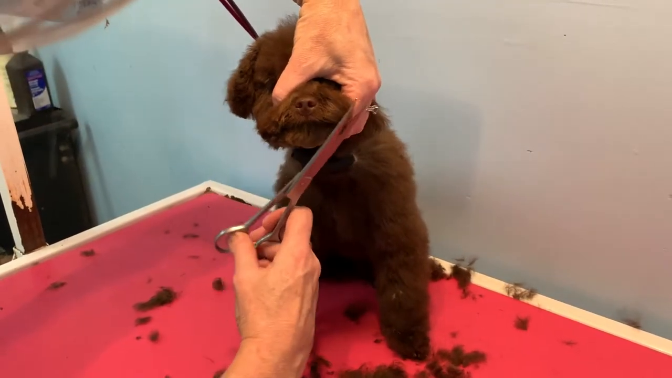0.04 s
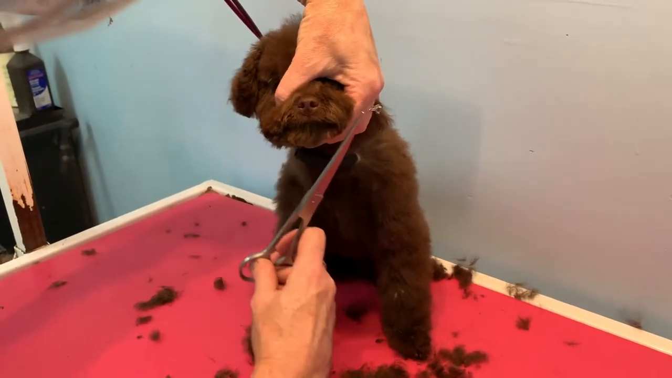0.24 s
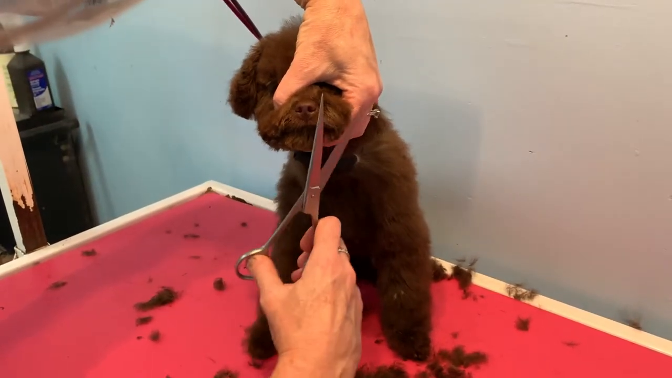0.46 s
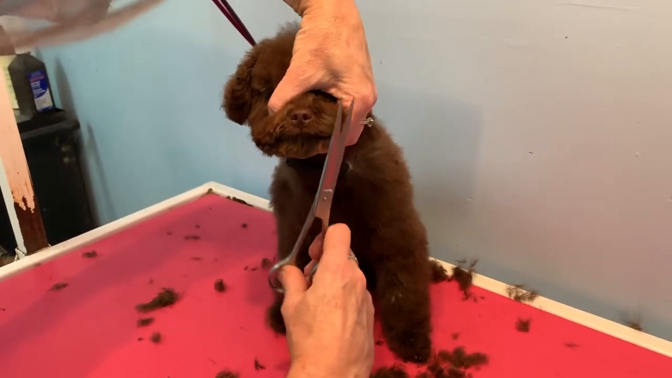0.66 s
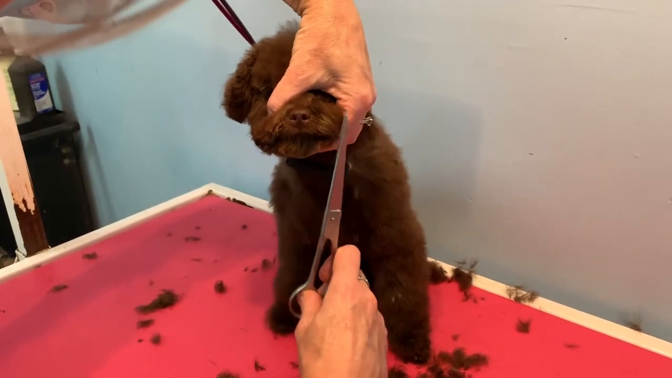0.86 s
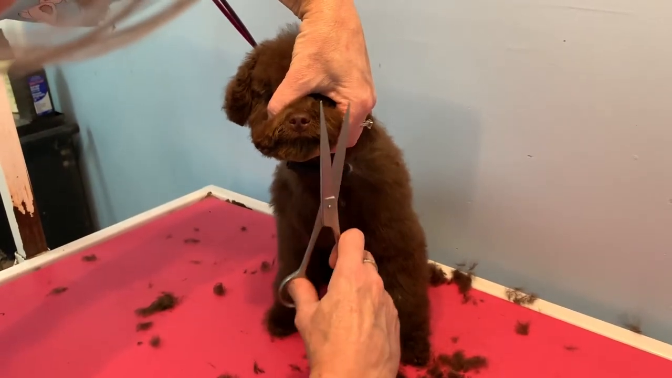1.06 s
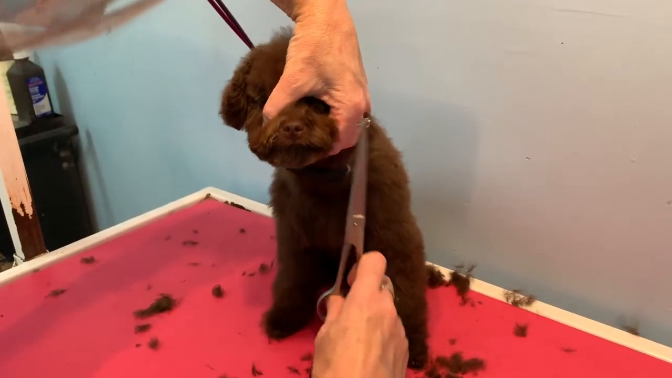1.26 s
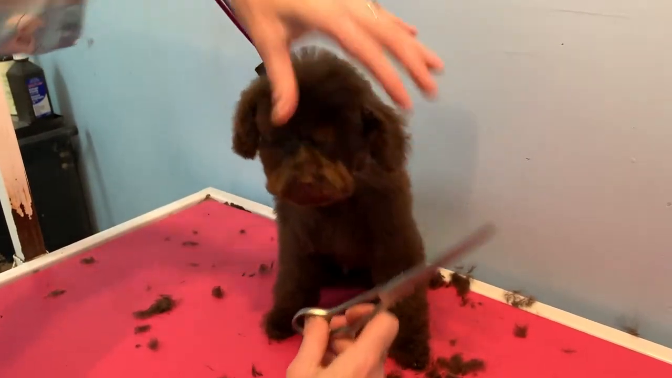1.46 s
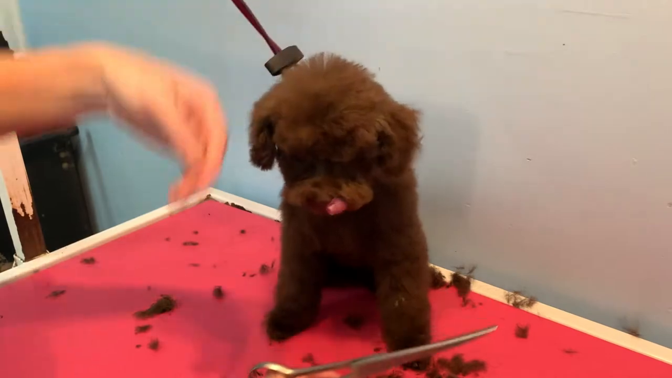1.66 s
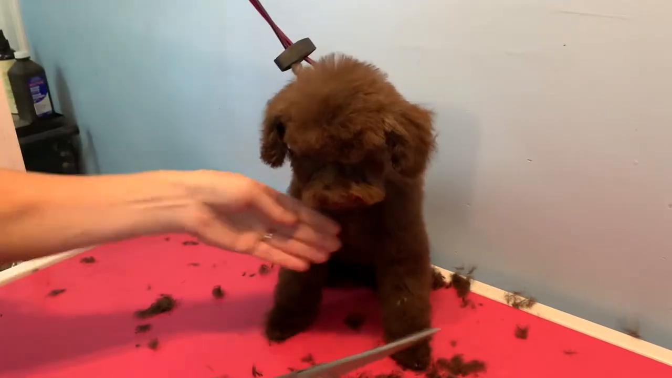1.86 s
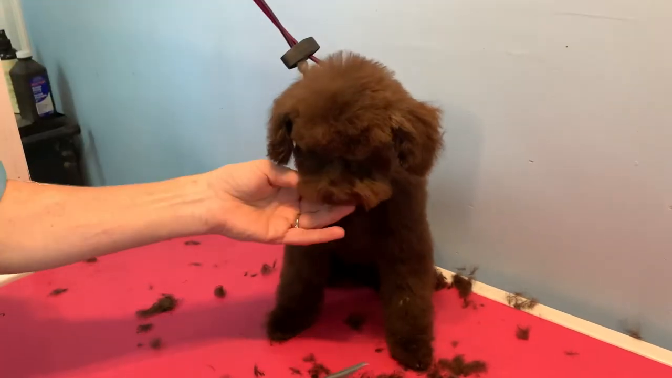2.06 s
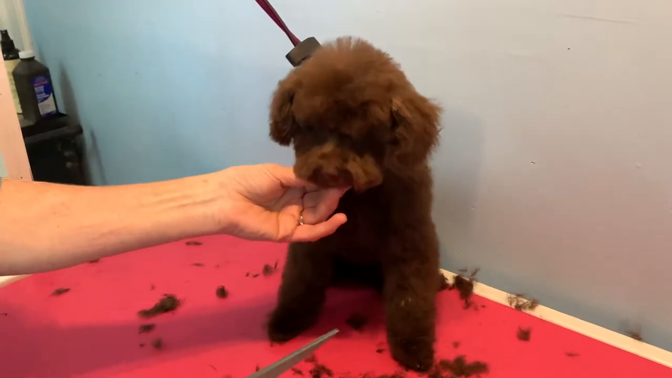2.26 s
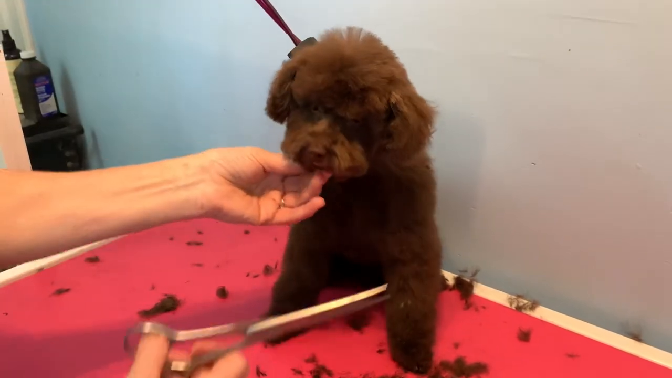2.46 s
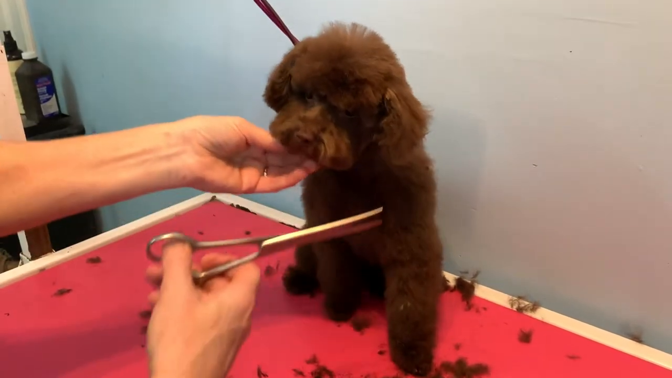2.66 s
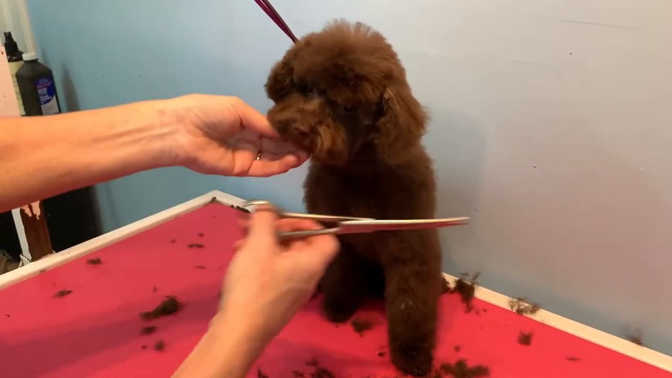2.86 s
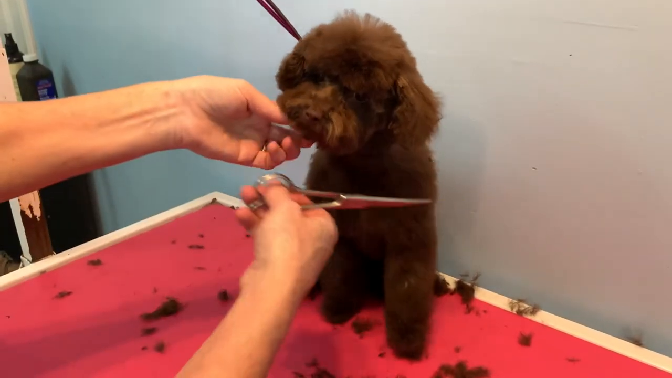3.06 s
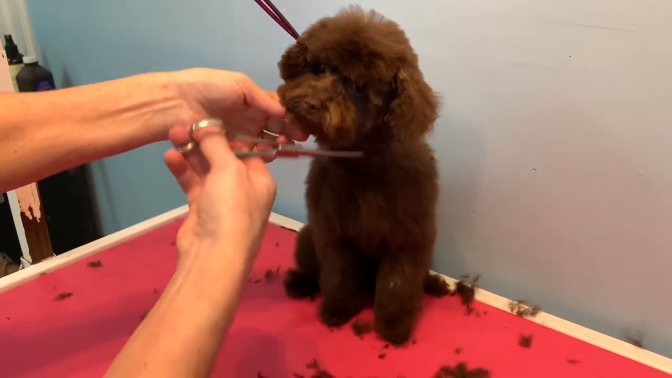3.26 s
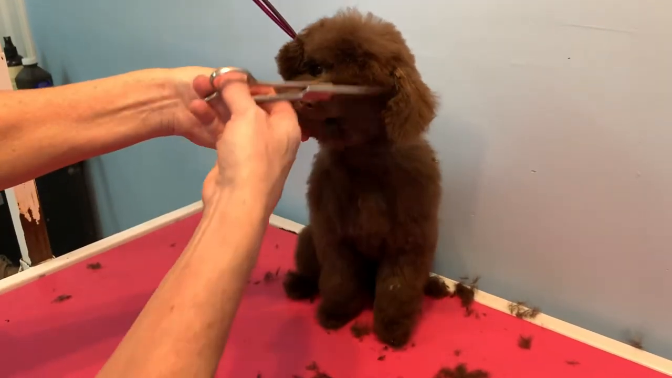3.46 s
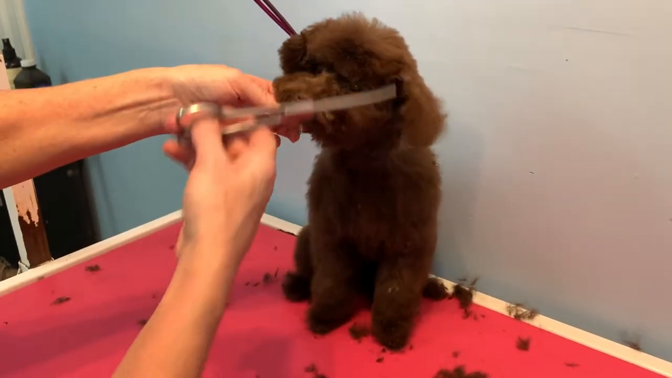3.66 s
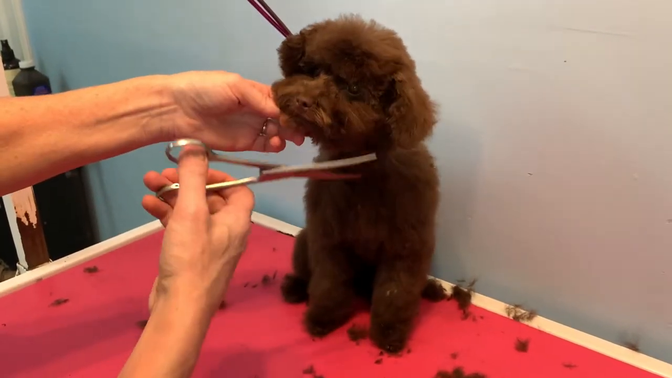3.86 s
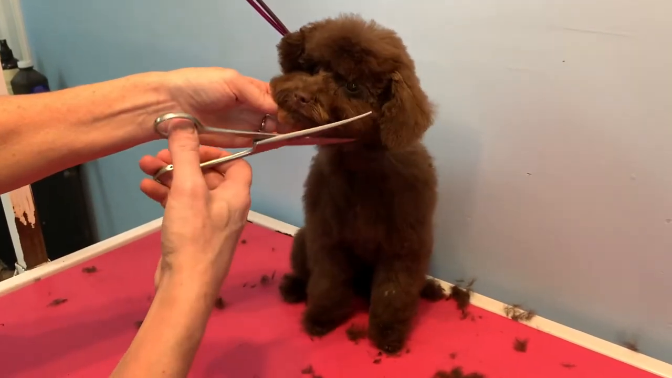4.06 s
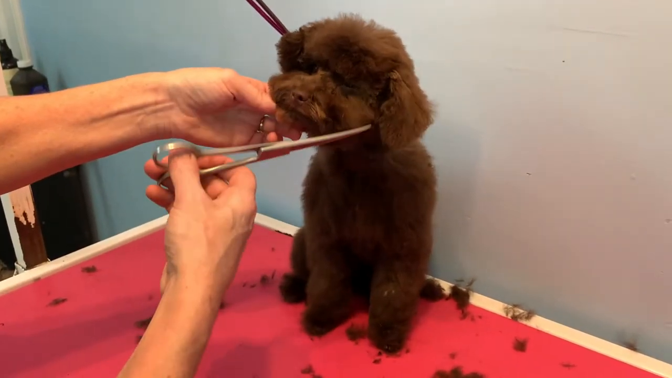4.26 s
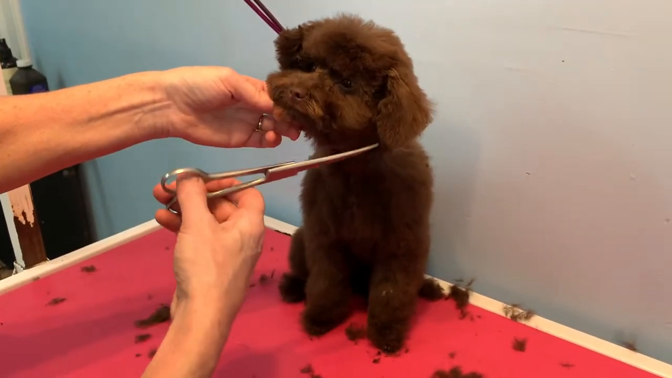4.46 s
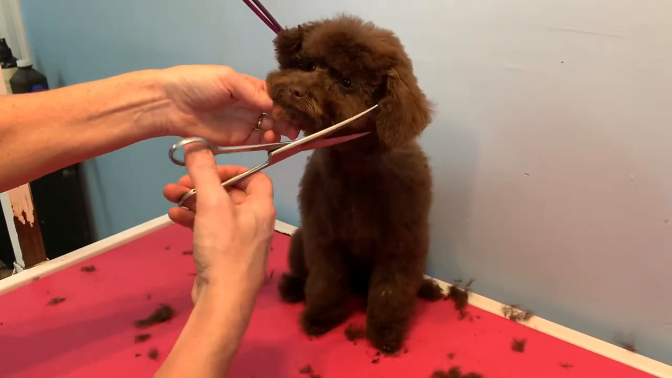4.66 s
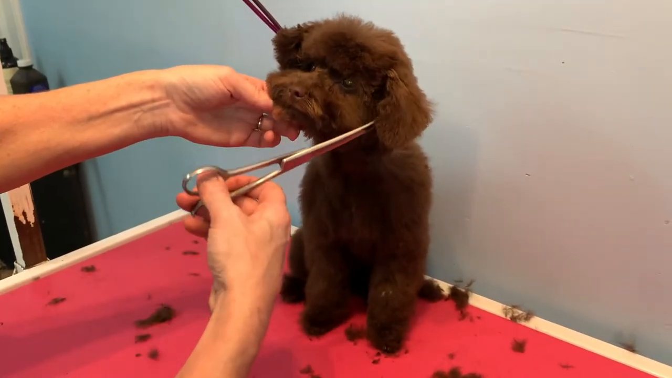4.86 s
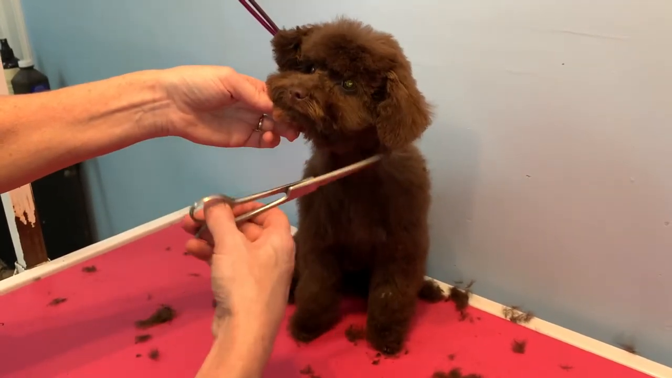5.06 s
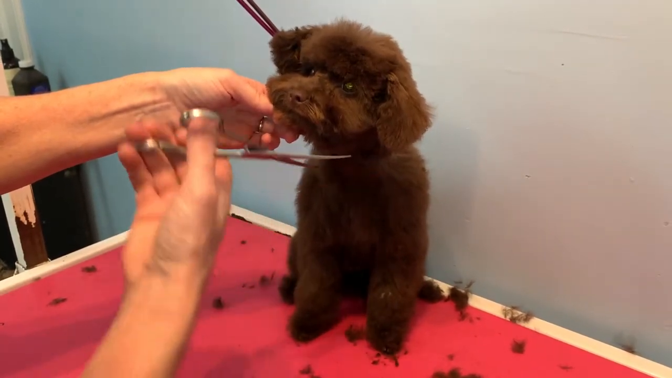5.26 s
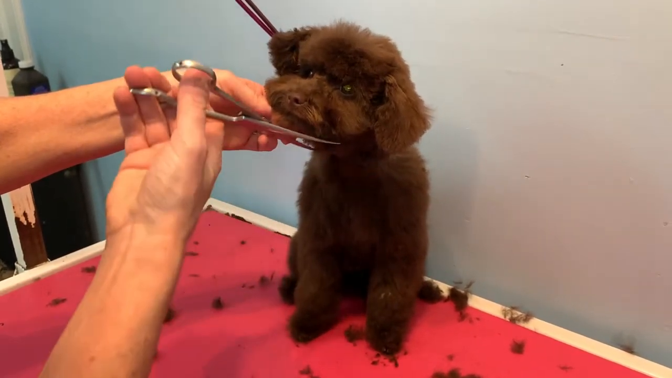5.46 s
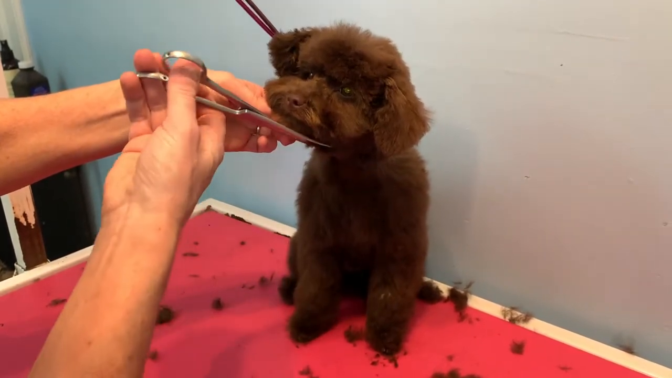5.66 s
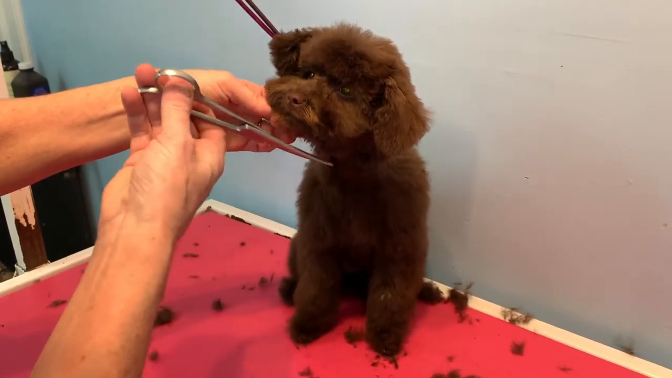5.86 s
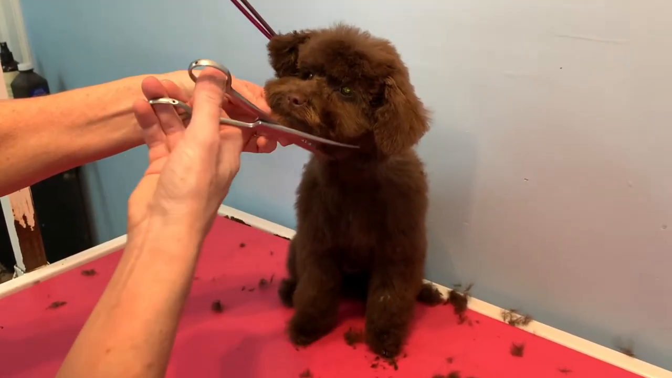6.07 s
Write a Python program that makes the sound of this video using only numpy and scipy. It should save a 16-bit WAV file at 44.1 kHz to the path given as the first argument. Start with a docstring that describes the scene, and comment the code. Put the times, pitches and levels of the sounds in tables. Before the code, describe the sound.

Close, slightly right of a stereo microphone in a small hard room, steel shears give bright, dry snips at irregular gaps, some preceded by faint scraping. Midway the cutting pauses: fur and cloth rustle and paws knock dully on a padded table. Behind, a bearing squeaks up to six times a second over low motor hum and moving air. Cutting resumes, with the strongest snap near the end.

```python
"""Steel grooming shears cut dog hair in a small hard room, to the right of a two-port microphone.
Noise bursts strike the ringing modes of the blades in snaps and ticks; tiny slips grind the same modes.
Shaped noise makes fur and cloth rustle, and falling tones make paws knock on a padded table.
Behind them a bearing squeaks up to six times a second, from gliding tones and hiss.
Two motors hum as sums of wavering sines, over a wash of air made of coloured noise."""
import sys
import numpy as np
from scipy import signal
from scipy.fft import rfft, irfft
from scipy.io import wavfile
from scipy.ndimage import uniform_filter1d

SR = 44100
rng = np.random.default_rng(int(sys.argv[2]) if len(sys.argv) > 2 else 0)


def invert_db(level):
    """Linear amplitude ratio for a level in decibels (20 dB per decade), elementwise."""
    return 10 ** (np.asarray(level, dtype=float) / 20)


def inscribe(sig):
    """Save sig as 16-bit PCM at rate SR to the path in sys.argv[1].

    A 1-D sig is mono; a 2-D sig holds one channel per row.
    Samples are clipped to [-1, 1] before scaling.
    """
    pcm = np.round(np.clip(np.atleast_2d(sig).T, -1, 1) * 32767)
    wavfile.write(sys.argv[1], SR, pcm.astype(np.int16))


N = 269884  # samples


def evened(x):
    """Scales a sound to an rms of one."""
    return x / np.sqrt(np.mean(x ** 2) + 1e-20)


def read(points, hz):
    """Reads a curve of (f/Hz, value) between its points, on a logarithmic pitch scale."""
    f, value = np.transpose(points)
    return np.interp(np.log(hz + 1), np.log(f + 1), value)


def add(mix, s, sound):
    """Adds a sound to the mix at time s, cut off at the end of the mix."""
    part = mix[round(s * SR):][:len(sound)]
    part += sound[:len(part)]


# tones in which the steel blades ring: f/Hz, relative level/dB, basic time to fall 60 dB t60/s
BLADES = [(1300, -29.5, 0.0057), (1735, -15.5, 0.0028), (2140, 3.5, .007), (2780, -12, 0.0054),
          (3410, -10.5, 0.0048), (4023, 4, 0.019), (4340, 1.5, 0.0082), (4954, 5.5, 0.014), (5400, 2, .008),
          (6070, 4, 0.0077), (7440, -8, 0.013), (7840, -2.5, 0.0034), (8184, 1.5, 0.026), (8520, -2, 0.007),
          (9270, -11.5, 0.0093), (9600, -3.5, .008), (10100, -0.5, 0.02), (9945, -1.5, 0.0094),
          (10400, -2.5, 0.0082), (10645, 3, 0.018), (11340, 6.5, 0.006), (12900, 8.5, 0.0048),
          (14160, -0.5, 0.011), (13820, -3, 0.006), (12550, -2, 0.0063), (14100, 16.5, 0.0065),
          (14800, 7, 0.008), (14980, -11.5, 0.0063), (15280, 5.5, 0.018), (10900, -3.5, .006)]
# borders between the low, middle, high and top groups of blade modes: f/Hz
GROUP_EDGES_HZ = [6500, 9100, 12000]


def modes(ring, free=1, detune=1):
    """The dying tone of each blade mode and its group; a loose grip lets the middle group ring on."""
    hz, db, t60 = np.transpose(BLADES)[:, :, None]
    t = np.arange(3000) / SR
    group = np.digitize(hz, GROUP_EDGES_HZ)
    t60 = t60 * ring * np.where(group == 1, free, 1)
    tones = invert_db(db - 60 * t / t60) * np.sin(2 * np.pi * hz * detune * t)
    return tones, group[:, 0]


# clicks of the blades, from loud closing snaps to small ticks as they open:
# t/s, then relative level/dB of the top, low, middle and high mode groups,
# and looseness of the grip (factor on the ring time of the middle group)
CLICKS = [(0.1025, -24, -45, -30.5, -36.5, 0.24), (0.2919, -41, -57, -49, -52, 0.47),
          (0.32, -38, -58, -48, -52, .8), (0.7175, -22.5, -43.5, -29, -34.5, 0.34),
          (0.9134, -54, -63, -53, -51, .8), (.9498, -50, -59, -60, -58, .8),
          (1.1628, -17, -37, -21.5, -25.5, 0.55), (1.489, -16, -40.5, -22.5, -22, 2),
          (2.9428, -23, -38, -25, -26.5, 2.6), (3.8146, -33.5, -44.5, -45, -35, 0.97),
          (4.2721, -21, -35.5, -25.5, -27.5, 1.1), (4.5014, -46, -61, -50, -43, 0.55),
          (4.8933, -16, -28, -21.5, -19, 1.3), (5.116, -44, -54, -51, -58, .8),
          (5.7087, -41.5, -46, -52.5, -36, .8), (5.7535, -10, -29.5, -18.5, -14.5, 0.94),
          (5.955, -37.5, -58, -44, -46.5, 0.72)]


def clicks():
    """Each click gives every blade mode one sharp blow and a few milliseconds of chatter."""
    out, t = np.zeros(N), np.arange(700) / SR
    blow = np.exp(-t / 0.00022) + 0.28 * np.exp(-t / 0.0052)
    jolts = rng.standard_normal((len(CLICKS), len(BLADES), len(t)))
    for (s, top_db, low_db, middle_db, high_db, free), jolt in zip(CLICKS, jolts):
        # the grip shifts the modes a little
        rings, group = modes(1.05, free, detune=1 + .008 * jolt[:, -1:])
        struck = signal.fftconvolve(jolt * blow, rings, axes=1)
        # each struck mode keeps the energy of its plain ring
        struck *= (np.linalg.norm(rings, axis=1) / np.linalg.norm(struck, axis=1))[:, None]
        struck *= invert_db(1.1 * jolt[:, -2:-1])  # no two blows land on the same spot
        for g, db in enumerate([low_db, middle_db, high_db, top_db]):
            part = struck[group == g].sum(0)
            loudest = uniform_filter1d(part ** 2, size=88).max()  # power over 2 ms
            add(out, s, invert_db(db) * part / np.sqrt(loudest * 2))
    return out


STOP_DB_PER_S = 900  # how fast grinds and swells die away
GRIND_START_DB, GRIND_HIGH_DB = -18.5, -4  # level at the start against the end; high group against top
# the edges grinding while the blades close: start t/s, end t/s,
# level/dB of the low, middle and top mode groups at the end
GRINDS = [(0.032, .1, -60, -76, -72), (0.563, .716, -82, -55, -59), (1.078, 1.16, -75, -78, -63),
          (3.755, 3.813, -74, -78, -64.5), (4.198, 4.271, -65.5, -72, -59),
          (4.769, 4.891, -69.5, -60, -55.5), (5.571, 5.75, -69.5, -69.5, -54)]


def grind_power(t):
    """Grinding swells steadily in dB as the blades close, in each mode group."""
    power = np.zeros((4, N))
    for start, end, low_db, middle_db, top_db in GRINDS:
        growth = np.interp(t, [start, end], [GRIND_START_DB, 0])
        outside = np.maximum(np.maximum(t - end, start - t), 0)  # seconds away from the grind
        groups_db = np.c_[[low_db, middle_db, top_db + GRIND_HIGH_DB, top_db]]
        power += invert_db(growth - STOP_DB_PER_S * outside + groups_db) ** 2
    return power


SWELL_RISE_DB_PER_S = 1102
# level/dB of the low, middle, high and top mode groups, added to each swell
SWELL_GROUPS_DB = [-10, 4, -3.5, 2.5]
# short noise swells up to a loud snap: end t/s, level/dB at the end before the group levels
SWELLS = [(.714, -51), (1.158, -47), (3.813, -57), (4.27, -44.5), (4.889, -38), (5.752, -40)]


def swell_power(t):
    """A short noise swells steeply up to each of several loud snaps, then dies quickly."""
    power = np.zeros((4, N))
    for end, db in SWELLS:
        shape = np.where(t < end, SWELL_RISE_DB_PER_S, -STOP_DB_PER_S) * (t - end)
        power += invert_db(db + shape + np.c_[SWELL_GROUPS_DB]) ** 2
    return power


def swell_past(t, s):
    """True once the first swell to peak after time s has reached its peak."""
    return t > min([end for end, db in SWELLS if end > s], default=np.inf)


CATCH_RISE_DB_PER_S, CATCH_MIDDLE_DB = 902, -10  # middle group against the high one
# an edge catching on hair or on the other blade: t/s, level/dB of the high mode group,
# level/dB of the low and top groups against it, fade in dB a second
CATCHES = [(0.02, -59, -35, -12, 500), (0.058, -48, -25, -4, 500), (0.288, -71, 0, -8, 252),
           (.322, -64, -6, 4, 600), (.568, -69, -11, -9, 300), (0.599, -54, -30, -24, 450),
           (0.658, -48, -39, 1, 800), (0.912, -66, -2, -13, 380), (1.118, -61.5, -26, 1, 300),
           (4.22, -59.5, -13, 2, 202), (4.46, -60.5, -7.5, -5, 456), (4.5, -60, -3, 8, 500),
           (4.784, -61, -20, -7, 100), (4.804, -55, -23, -1, 800), (4.826, -57.5, -7, 3.5, 400),
           (5.074, -66, -5, 0, 150), (5.122, -69.5, -4, -0.5, 400), (5.6, -74, -27, -4, 49.7),
           (5.64, -71, -30, -3, 100), (5.675, -50.5, -15.5, 1, 150), (5.709, -68, -23, -6, 400),
           (5.919, -60, -7.5, 0, 302), (5.953, -62, -10, 3, 604)]


def catch_power(t):
    """An edge catches, then slides free in a fade that ends at the peak of the next swell at the latest."""
    power = np.zeros((4, N))
    for s, db, low_db, top_db, fade in CATCHES:
        shape = np.where(t < s, CATCH_RISE_DB_PER_S * (t - s), -fade * (t - s))
        groups_db = np.c_[[low_db, CATCH_MIDDLE_DB, 0, top_db]]
        power += invert_db(db + shape + groups_db) ** 2 * ~swell_past(t, s)
    return power


def strokes():
    """Clumps of tiny slips along the edges and parting hairs excite each group of blade modes."""
    t = np.arange(N) / SR
    drift = uniform_filter1d(rng.standard_normal((4, N)), size=150, axis=1)
    clumps = invert_db(6.8 * evened(drift))
    slips = clumps * rng.standard_normal((4, N))
    slips *= invert_db(3.2 * np.minimum(rng.exponential(1, N), 5))  # now and then a much stronger slip
    rings, group = modes(ring=1.0)
    parts = []
    for g, slip in enumerate(slips):
        ringing = signal.oaconvolve(slip, rings[group == g].sum(0))[:N]
        parts.append(evened(ringing))
    power = grind_power(t) + catch_power(t) + swell_power(t)
    return (np.sqrt(power) * np.array(parts)).sum(0)


LAG = 13  # samples by which the shears reach the left port late
# close echoes off table and hands, a list for the left port and one for the right: t/s, level/dB
BOUNCES = [
    [(.0011, -6), (.0021, -4), (.0086, -11)],
    [(.0009, -6), (.0018, -5), (.008, -12)],
]


def ports(x):
    """Direct sound, late at the left port, and a few close bounces that differ between ports."""
    out = np.array([np.r_[np.zeros(LAG), x[:-LAG]], x])
    for channel, bounces in zip(out, BOUNCES):
        for s, db in bounces:
            add(channel, s, invert_db(db) * x[:N - round(s * SR)])
    return out


# paws shifting on the table: t/s, relative level/dB, f/Hz before the fall in pitch
THUMPS = [(2.228, -42.5, 211), (2.277, -37, 310)]


def thumps():
    """Dull, falling knocks of the padded table top, each with a short low scuff."""
    out, t = np.zeros(N), np.arange(2500) / SR
    band = signal.butter(2, [200, 520], "band", fs=SR, output="sos")
    scuffs = evened(signal.sosfilt(band, rng.standard_normal((len(THUMPS), len(t)))))
    for (s, db, hz), scuff in zip(THUMPS, scuffs):
        knock = invert_db(-60 * t / 0.059) * np.sin(2 * np.pi * hz * t * (1.05 - 3 * t))
        onset = 1 - np.exp(-t / 0.001)
        add(out, s, invert_db(db) * onset * (knock + 0.2 * scuff * invert_db(-60 * t / 0.17)))
    return out


# how alike noise is at the two ports: f/Hz, likeness before each sound's own factor (1 = identical)
SAME = [(60, 0.94), (120, 1), (170, .4), (240, 1), (400, .9), (500, 0.22), (1200, 0.1), (2400, 0.025),
        (15000, .1)]


def noise(colour, patchy_db, alike=1):
    """Two channels of random short-time spectra with drifting patches."""
    hz = np.fft.rfftfreq(1024, 1 / SR)
    a, b, c, d, patches = rng.standard_normal((N // 256 + 5, 513, 5)).T
    patches = uniform_filter1d(uniform_filter1d(patches, size=12, axis=0), size=10, axis=1)
    same = np.clip(alike * read(SAME, hz), -1, 1)[:, None]
    left = a + 1j * b
    right = same * left + np.sqrt(1 - same ** 2) * (c + 1j * d)
    z = np.array([left, right])
    z *= invert_db(read(colour, hz)[:, None] + patchy_db * evened(patches))
    return signal.istft(z, nperseg=1024, noverlap=768)[1][:, :N]


# loudness of moving fur and cloth: t/s, level/dB
RUSTLE = [(0, -80), (.5, -73.5), (.62, -72), (.8, -66), (.85, -92), (.9, -67), (1.03, -80), (1.3, -71),
          (1.6, -64), (1.69, -68.5), (1.75, -62.5), (1.97, -72.5), (2.06, -66.5), (2.14, -60), (2.2, -71),
          (2.238, -50), (2.275, -50), (2.38, -66.5), (2.65, -64), (2.77, -58.5), (2.92, -58.5),
          (3.04, -67.5), (3.1, -61), (3.2, -72), (3.26, -64.5), (3.4, -61.5), (3.54, -75.5), (3.59, -61.5),
          (3.75, -58.5), (3.8, -70), (4.05, -70.5), (4.2, -77.5), (4.5, -71.5), (4.7, -78.5), (4.8, -72),
          (5.0, -73), (5.08, -64), (5.2, -76), (5.27, -65.5), (5.47, -72), (5.62, -87), (5.9, -73),
          (6.12, -69)]
# tone colour of that rustle: f/Hz, relative level/dB
RUSTLE_COLOUR = [(150, -12.5), (400, -4.5), (1500, -1.5), (3500, -2.5), (7000, -7), (10500, -7),
                 (14200, -15.5), (14800, -35), (16500, -45)]


def rustle():
    """Soft wide hiss that swells as hands and dog move."""
    s, db = np.transpose(RUSTLE)
    hiss = noise(RUSTLE_COLOUR, patchy_db=4.0, alike=0.19)
    return invert_db(np.interp(np.arange(N) / SR, s, db)) * evened(hiss)


SQUEAK_HZ, SQUEAK_SPREAD = 1115.4, .012  # mean pitch before glide; relative stray of single squeaks
GROAN_HZ = 610.4  # mean pitch
# relative level at a squeak of -56 dB, dB per dB of squeak, random spread in dB
GROAN_DB, GROAN_FOLLOWS, GROAN_SPREAD_DB = -57, 0.75, 3
CHAFE_DB, CHAFE_FOLLOWS = -67, .4  # the dry hiss of each slip: same meaning as for the groan
# lower and upper border of the dry hiss: f/Hz
CHAFE_HZ = [1310, 2970]
# overtones of the squeal: multiple of its pitch, level/dB against the squeal
SQUEAK_PARTIALS = [(1, 0), (1.53, -18), (2, -20)]
# bearing squeaks: t/s, relative level/dB
SQUEAKS = [(0.0343, -60.5), (0.1994, -55.5), (0.3501, -56.5), (0.5377, -57), (0.6913, -56), (0.8559, -52.5),
           (1.0415, -60), (1.3832, -68), (1.7065, -64), (2.0577, -59), (2.3989, -52.5), (2.5606, -62.5),
           (2.7292, -62.5), (2.8983, -50), (3.0644, -49.5), (3.2236, -50.5), (3.3857, -54), (3.5628, -49.5),
           (3.7229, -58), (3.8885, -54.5), (4.0676, -56.5), (4.2158, -60.5), (4.3979, -57), (4.549, -57),
           (4.7137, -53.5), (4.8863, -58), (5.0504, -53), (5.6017, -97), (5.9259, -60.5)]


def squeaks():
    """Two short slips and a faint third: a wavering, falling squeal, a rough housing groan, dry hiss."""
    out, t = np.zeros(N), np.arange(4400) / SR
    band = signal.butter(2, CHAFE_HZ, "band", fs=SR, output="sos")
    slips = np.exp(-((t - .012) / 0.016) ** 2)
    slips += 1.02 * np.exp(-((t - .038) / 0.0091) ** 2)
    slips += 0.19 * np.exp(-((t - .065) / 0.0098) ** 2)
    chances = rng.standard_normal((len(SQUEAKS), 3, len(t)))
    for (s, db), chance in zip(SQUEAKS, chances):
        wobble, rough = evened(uniform_filter1d(chance[:2], size=250, axis=1))
        strength_db = db + 56
        hz = SQUEAK_HZ * (1 + SQUEAK_SPREAD * chance[0, 0])
        turns = np.cumsum(hz * (1.01 - 0.33 * t + 0.026 * wobble)) / SR
        squeal = sum(invert_db(db + d) * np.sin(2 * np.pi * k * turns) for k, d in SQUEAK_PARTIALS)
        groan_db = GROAN_DB + GROAN_FOLLOWS * strength_db + GROAN_SPREAD_DB * chance[1, 0]
        groan_turns = np.cumsum(GROAN_HZ * (1 + 0.082 * rough)) / SR
        groan = invert_db(groan_db) * np.sin(2 * np.pi * groan_turns)
        chafe_db = CHAFE_DB + CHAFE_FOLLOWS * strength_db
        chafe = invert_db(chafe_db) * evened(signal.sosfilt(band, chance[2]))
        add(out, s, (squeal + groan + chafe) * slips)
    return out


PUMP_HZ = 59.2  # turns a second of the first motor
# tones of the first motor: multiple of its turning speed
PUMP_ORDERS = [1, 2, 4, 6, 7, 8, 9, 10, 11, 14, 23]
# their relative level/dB
PUMP_DB = [-48, -67, -72, -71, -71.5, -85.5, -89, -68.5, -76, -82, -81.5]
FAN_HZ, PULL_HZ = 41.55, 119.94  # second motor: turns a second; magnetic pull at twice the mains
# tones of the second motor: multiple of the shaft speed, multiple of the pull, summed to one pitch
FAN_ORDERS = [(1, 0), (3, 0), (4, 0), (5, 0), (0, 1), (-1, 1), (1, 1), (2, 1), (3, 1), (4, 1), (-2, 2),
              (1, 2), (0, 3)]
# their relative level/dB
FAN_DB = [-69, -64.5, -70.5, -69, -55, -68.5, -80.5, -69.5, -66, -66, -70.5, -63.5, -75.5]


def motors():
    """Gently wavering tones of both motors, slightly ahead and softer at the right port."""
    shaft, pull = np.transpose(FAN_ORDERS)
    hz = np.r_[PUMP_HZ * np.array(PUMP_ORDERS), FAN_HZ * shaft + PULL_HZ * pull]
    levels_db = [*PUMP_DB, *FAN_DB]
    leads = [.06] * len(PUMP_DB) + [.09] * len(FAN_DB)  # turns
    t, right = np.arange(N) / SR, np.array([[0], [1]])
    waver = rng.standard_normal((len(hz), N // 64 + 1))  # one value per 64 samples
    waver = uniform_filter1d(uniform_filter1d(waver, size=60, axis=1), size=60, axis=1)
    waver = np.repeat(evened(waver), 64, axis=1)[:, :N]
    waver *= np.where(hz > 100, .4, .3)[:, None]  # dB
    tones = np.zeros((2, N))
    for f, db, w, phase, lead in zip(hz, levels_db, waver, rng.random(len(hz)), leads):
        tones += invert_db(db + w) * np.sin(2 * np.pi * (f * t + phase + lead * right))
    return np.sqrt(2) * tones * invert_db([[.6], [-.6]])


# tone colour of the wash of air: f/Hz, relative level/dB
AIR = [(25, -22.5), (45, -9), (70, 6), (140, -2.5), (270, 3.5), (400, -5.5), (520, -9.5), (620, -5.5),
       (720, -11.5), (900, -19), (1150, -15.5), (2000, -24.5), (5000, -39.5), (10500, -47), (14200, -40),
       (14800, -66.5)]


def air():
    """A steady wash of moving air: coloured noise with slightly drifting patches."""
    return invert_db(-56) * evened(noise(AIR, patchy_db=3.5))


# how long echoes last in the room: f/Hz, time to fall 60 dB t60/s
ROOM = [(1500, 0.47), (4000, 0.28), (9000, .26), (15000, 0.17)]


def room(x):
    """Sparse taps of random sign, one in every 20 samples, each band dying at its own speed."""
    taps = np.zeros((2, SR // 2))
    jitter = rng.integers(0, 20, (2, (SR // 2 - 261) // 20))
    at = np.arange(260, SR // 2 - 20, 20) + jitter
    np.put_along_axis(taps, at, rng.choice([-1., 1.], at.shape), 1)
    hz, t, z = signal.stft(taps, SR, nperseg=256)
    decay = invert_db(-60 * t / read(ROOM, hz)[:, None])
    tail = signal.istft(z * decay, SR, nperseg=256)[1]
    return signal.fftconvolve(x[None], tail / np.linalg.norm(tail[0]), axes=1)[:, :N]


def scene():
    """The shears sit near and to the right; the squeak is far and partly echo."""
    thin = signal.butter(2, 1100, "high", fs=SR, output="sos")  # slim blades radiate no bass
    shears = signal.sosfilt(thin, clicks() + strokes())
    squeak = squeaks()
    near = ports(shears) * invert_db([[-.3], [.3]])
    echo = room(invert_db(-9) * shears + invert_db(-7.5) * squeak)
    return near + echo + invert_db(-4.0) * squeak + thumps() + rustle() + motors() + air()


# treble curve of the stored sound, thinned between 11 and 12.5 kHz, with a steep top: f/Hz, level/dB
TREBLE = [(20, 0), (11100, 1), (11400, -16.5), (12100, -11.5), (12500, 3.5), (16000, -4), (16700, -19.5),
          (17600, -40.5)]


def treble_curve(dry):
    """Scales each frequency of the whole mix by the treble curve of the stored sound."""
    gain = invert_db(read(TREBLE, np.fft.rfftfreq(N, 1 / SR)))
    return irfft(rfft(dry) * gain, N)


def roll_off(x):
    """The treble ends steeply here."""
    return signal.sosfilt(signal.butter(12, 17650, fs=SR, output="sos"), x)


def record(dry):
    """The finished mix gets its treble curve and is stored."""
    coloured = treble_curve(dry)
    return roll_off(coloured)


dry = scene()
out = record(dry)
inscribe(out)
```